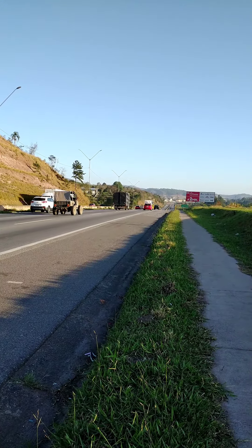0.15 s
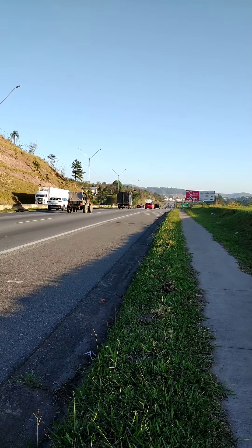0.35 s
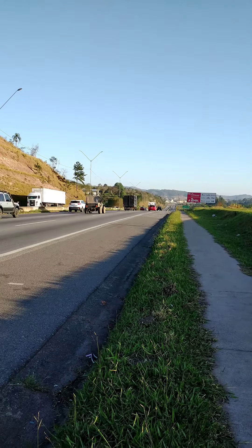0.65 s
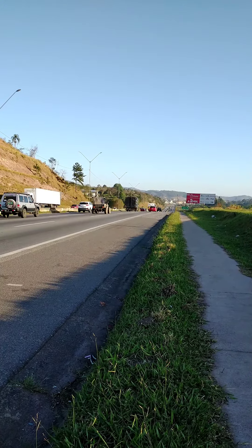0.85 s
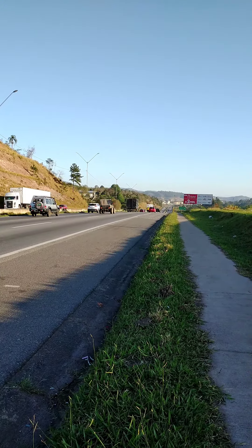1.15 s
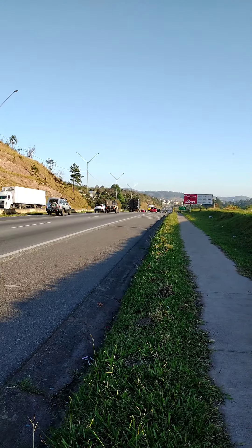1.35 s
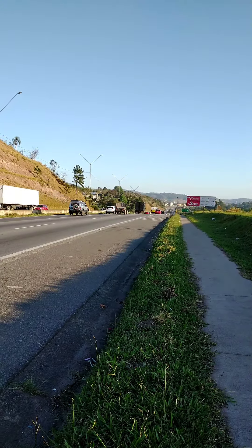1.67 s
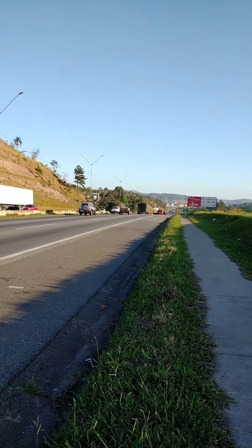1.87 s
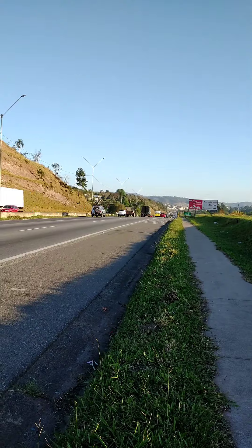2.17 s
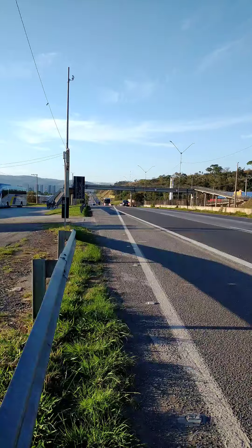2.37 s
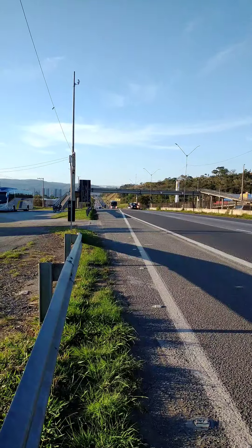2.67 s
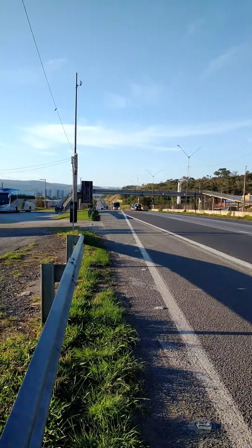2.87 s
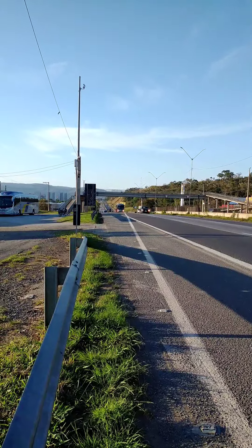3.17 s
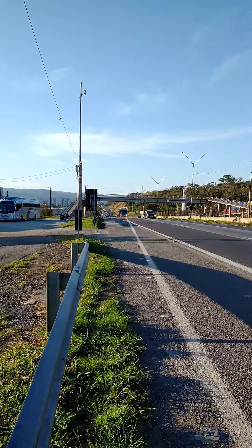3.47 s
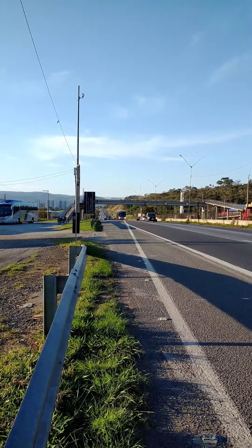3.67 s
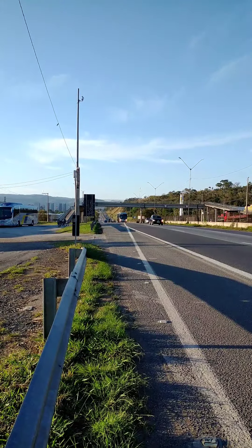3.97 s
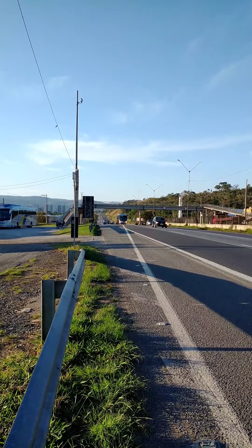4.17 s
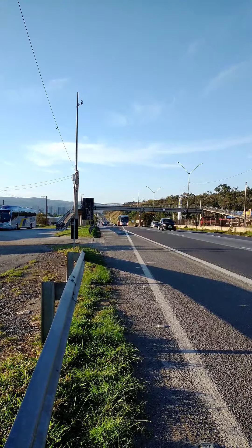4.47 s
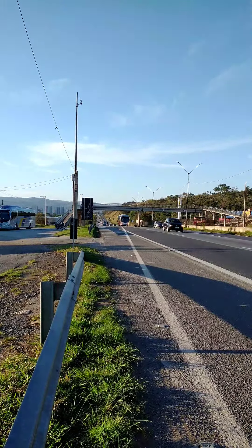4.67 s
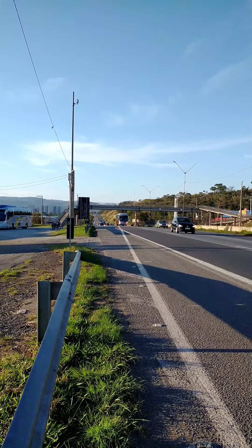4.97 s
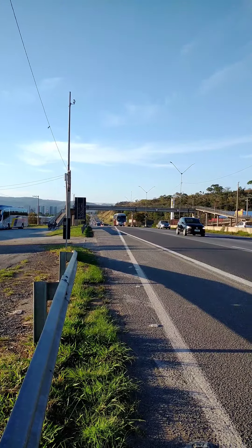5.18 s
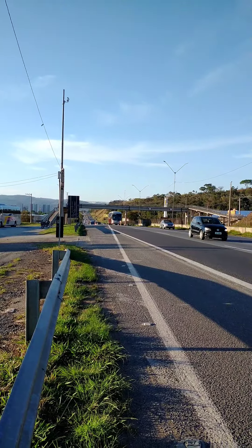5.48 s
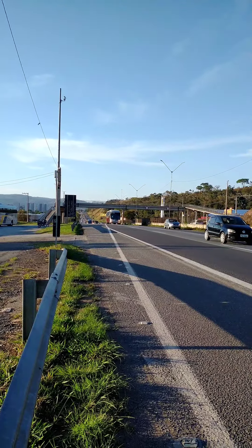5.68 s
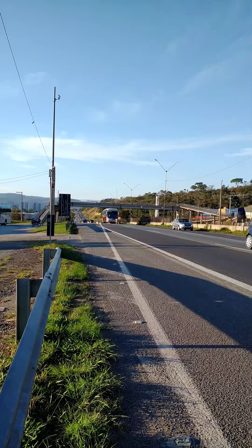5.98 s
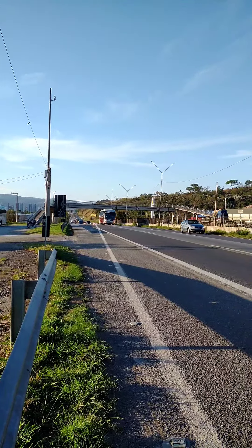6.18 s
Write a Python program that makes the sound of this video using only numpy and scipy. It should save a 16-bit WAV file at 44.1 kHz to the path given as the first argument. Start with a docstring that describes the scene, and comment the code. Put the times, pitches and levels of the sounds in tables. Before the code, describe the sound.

A receding truck engine and far traffic hum along a highway, heard in stereo from a phone at the roadside. After a brief dead silence, a heavy truck rumbles by close, its tyres roaring and singing, with hissing air, a few short squeaks and low wind thumps on the microphone. It moves off, and the tyre noise of oncoming cars swells until the end.

```python
"""Trucks on a highway, heard through a phone's two microphone ports. One drones away uphill at
multiples of its firing rate, amid the tyre roar and engine hum of distant traffic. The sound cuts
out and returns at another spot: a heavy truck passes close with singing tread, hiss, puffs of air,
squeaks and a turbo whistle, and the eddies of its wake buffet the ports. As it leaves, cars come
nearer on roaring tyres, one groove whistling."""
import sys
import numpy as np
from scipy import signal
from scipy.fft import rfft, irfft, next_fast_len
from scipy.io import wavfile
from scipy.ndimage import uniform_filter1d, map_coordinates

SR = 44100
rng = np.random.default_rng(int(sys.argv[2]) if len(sys.argv) > 2 else 0)


def store_wav(level_fs):
    """Save 16-bit WAV to argv[1]."""
    pcm = np.round(np.clip(np.atleast_2d(level_fs), -1, 1) * 32767)
    wavfile.write(sys.argv[1], SR, pcm.T.astype(np.int16))


N = 279153
TIME_S = np.arange(N) / SR
CUT_S, BACK_S = 2.3248, 2.5515  # the silent gap

# Port responses, one per source direction: frequency_hz, coherence, left_lag_rad, left_minus_right_db
FAR_PORTS = [(320, 0.89, 0.24, 4), (490, 1, 0.22, -5.5), (860, 0.91, 0.13, 2), (1600, .87, 0.74, 0),
             (2290, 0.6, 1.86, 4.5), (2850, 0.2, 2.4, -2.5), (3580, 0, 0.74, -2.5), (4300, .6, 0.27, -2.5),
             (6000, .3, 5.5, 7), (12000, .1, 0.83, -5.5)]
TRUCK_PORTS = [(320, 1, 0.05, 1.5), (490, .92, 0.46, 2), (860, 0.96, 0.57, 1.5), (1590, 0.66, 0.79, 1.5),
               (2240, 0.53, 3.1, -2.5), (2900, .4, 1.2, -5), (4300, .57, 0.44, 7), (5800, 0.61, 1.9, -1.5),
               (7000, .36, 1.9, 6), (12270, .25, 2.1, 1.5)]
CAR_PORTS = [(323, 1, -1.4, 2.5), (470, .88, 0.6, -2.5), (840, 1, -0.8, 0.6), (1560, 0.68, 0.3, 2),
             (2190, 0.48, 1.2, 4), (2860, .45, 1.4, -6.5), (3600, .1, 1.4, 0.5), (4200, .5, 0.074, 20),
             (7000, .4, 4, 13.5), (12000, .2, 10.5, 12)]
# Hiss spectrum of both trucks: frequency_hz, relative_db
HISS_SPECTRUM = [(1200, -36), (2500, -2.5), (4300, 0), (5200, -8.5), (8200, -18), (9500, -23),
                 (11500, -19.5), (13500, -28), (15500, -40)]


def amp(db):
    """Amplitude grows tenfold per 20 dB."""
    return 10 ** (np.asarray(db) / 20)


def unit(x):
    """Normalisation to rms 1."""
    return x / np.sqrt(np.mean(x ** 2) + 1e-20)


def along(rows, hz):
    """Interpolation of each column on a logarithmic frequency axis."""
    knots_hz, *columns = np.transpose(rows)
    return np.array([np.interp(np.log(hz + 1), np.log(knots_hz + 1), c) for c in columns])


def curves(rows):
    """Linear interpolation of each column over time."""
    knots_s, *columns = np.transpose(rows)
    return [np.interp(TIME_S, knots_s, c) for c in columns]


def gate(rows, rise_s, fall_s):
    """Trapezoidal envelope: 1 over a table's span, with a fade on either side."""
    start, end = rows[0][0], rows[-1][0]
    return np.interp(TIME_S, [start - rise_s, start, end, end + fall_s], [0, 1, 1, 0])


def glide(rows, hz, hz_per_s):
    """Linear pitch drift from a table's first time."""
    return hz + hz_per_s * (TIME_S - rows[0][0])


def wobble(knots_per_s):
    """Smooth random modulation: a spline through Gaussian values."""
    knots = rng.standard_normal(int(N * knots_per_s / SR) + 4)
    return map_coordinates(knots, [TIME_S * knots_per_s])


def filtered(x, response):
    """Linear filtering: the spectrum times a complex frequency response."""
    size = next_fast_len(N + 8192)
    return irfft(rfft(x, size) * response(np.fft.rfftfreq(size, 1 / SR)), size)[..., :N]


def at_ports(pair, ports):
    """Partial coherence: a shared and an unshared signal mix, then each port has its lag and level."""
    # Long waves reach both ports alike: frequency_hz, coherence, left_lag_rad, left_minus_right_db
    bass_ports = [(130, 1, 0, 0), (240, .992, .06, .7)]
    ports = bass_ports + ports

    def split(hz):
        angle = np.arccos(np.clip(along(ports, hz)[0], 0, 1)) / 2
        return np.array([np.cos(angle), np.sin(angle)])

    def tilt(hz):
        _, lag_rad, pan_db = along(ports, hz)
        left = amp(pan_db / 2) * np.exp(-.5j * lag_rad)
        return np.array([left, 1 / left])

    mid, side = filtered(pair, split)
    return filtered(np.array([mid + side, mid - side]), tilt)


def rush(spectrum, ports, patchy_db):
    """Shaped stereo noise of rms 1, modulated in random patches of time and frequency."""
    cells = signal.stft(rng.standard_normal((2, N)), nperseg=512)[2]
    patches = uniform_filter1d(rng.standard_normal(cells.shape[1:]), size=5, axis=0)
    patches = uniform_filter1d(patches, size=12, axis=1)
    pair = signal.istft(cells * amp(patchy_db * unit(patches)), nperseg=512)[1][:, :N]
    shaped = filtered(pair, lambda hz: amp(along(spectrum, hz)[0]))
    return unit(at_ports(shaped, ports))


def roar(levels, spectrum, ports, rise_s=.04, fall_s=.04):
    """Rolling noise, a little patchy and unsteady as the road surface changes."""
    flutter_db = .35 * wobble(9)
    gain = amp(curves(levels)[0] + flutter_db) * gate(levels, rise_s, fall_s)
    return gain * rush(spectrum, ports, patchy_db=1.2)


def alongside(level_db, arrives_s, leaves_s, halve_before_s, halve_after_s):
    """Spherical spreading: pressure falls as 1 / distance. Gives rows of time_s, level_db."""
    s = np.arange(BACK_S, N / SR, 1 / 20)
    away = np.maximum(arrives_s - s, 0) / halve_before_s + np.maximum(s - leaves_s, 0) / halve_after_s
    return np.transpose([s, level_db - 20 * np.log10(1 + away)])


def tone(hz, rms_db, waver_rad):
    """A sine whose spectral line is broadened by random phase modulation."""
    phase = 2 * np.pi * (np.cumsum(hz) / SR + rng.random()) + waver_rad * wobble(14)
    return np.sqrt(2) * amp(rms_db) * np.sin(phase)


def hum(levels, start_hz, hz_per_s, waver_rad):
    """A gliding tone whose amplitude modulation scales with its phase wander."""
    level_db = curves(levels)[0] + 4 * waver_rad * wobble(30)
    return gate(levels, .039, .2) * tone(glide(levels, start_hz, hz_per_s), level_db, waver_rad)


def engine(levels, firing_hz, orders, rough_rad, dip_db=0):
    """Periodic firing gives two clean harmonics; uneven cylinders add weaker, fluttering orders."""
    first_db, second_db = curves(levels)
    first_db = first_db - dip_db
    slow_db = uniform_filter1d(first_db, size=SR // 3)
    weak = sum(tone(k * firing_hz, slow_db + db + 4 * wobble(11), rough_rad * k) for k, db in orders)
    clean = tone(firing_hz, first_db, .08) + tone(2 * firing_hz, second_db, .14)
    return gate(levels, .054, .12) * (clean + weak)


def uphill_engine():
    """Engine orders of a receding truck: the first fades with distance while the second swells."""
    levels = [(0, -28.5, -31), (.3, -32, -21), (.63, -39, -30), (.97, -37.5, -25.5), (1.32, -38.5, -30),
              (1.58, -38, -34), (1.95, -39, -30.5), (2.32, -39, -35)]  # harmonics: time_s, firing_order_db, second_order_db
    orders = [(1.5, -6.5), (2.5, -12.5), (3, -7), (3.5, -10), (4, -10.5)]  # weak orders: firing_multiple, over_firing_order_db
    return engine(levels, glide(levels, hz=77, hz_per_s=.8), orders, rough_rad=.31)


def uphill_tyres():
    """High-frequency rolling noise fades as the first truck recedes."""
    levels = [(0, -57), (.2, -59.5), (.5, -63.5), (.9, -70)]  # tyre hiss: time_s, level_db
    return roar(levels, HISS_SPECTRUM, FAR_PORTS, fall_s=.4)


def distant_traffic():
    """Rolling noise of many far tyres adds incoherently to a dull roar."""
    levels = [(0, -26.5), (.25, -28.5), (.6, -30.5), (1.1, -31.5), (1.7, -32), (2.32, -33)]  # distant tyres: time_s, level_db
    spectrum = [(20, -53), (45, -20), (95, -10), (135, -9.5), (270, -5.5), (440, -16), (760, -4.5),
                (1150, -13), (1500, -12.5), (2300, -20), (3200, -41), (4100, -41.5), (5500, -53),
                (15500, -72.5)]  # their roar: frequency_hz, relative_db
    return roar(levels, spectrum, FAR_PORTS)


def other_engines():
    """Periodic firing of other engines, each heard as one drifting partial."""
    pitches = [(107.5, 1.3, .3), (230.5, -1.2, .45), (202, -.5, .9), (120, -1.8, .39), (58, -.8, .3)]  # hums: start_hz, glide_hz_per_s, waver_rad
    envelopes = [
        [(0, -31), (.3, -35), (.7, -45), (1.1, -36), (1.7, -50), (2.32, -43)],
        [(2.58, -34.5), (2.9, -31.5), (3.5, -44)],
        [(3.2, -41), (3.6, -30), (4.1, -35), (4.6, -35.5), (4.75, -39)],
        [(2.9, -37), (3.5, -30), (4.1, -44), (4.35, -31), (4.7, -39), (5.3, -42), (5.9, -38), (6.2, -33),
         (6.33, -33)],
        [(2.58, -37), (3.5, -47), (5.2, -47), (6.33, -54)],
    ]  # one table per hum: time_s, level_db
    return sum(hum(levels, *pitch) for levels, pitch in zip(envelopes, pitches))


def passing_roar():
    """Broadband tyre and exhaust noise of the close truck follows the inverse-distance law."""
    spectrum = [(20, -57), (50, -19.5), (75, -3.5), (140, -2.4), (270, -4.5), (420, -8), (650, -6.9),
                (1100, -10.5), (1800, -18), (2600, -25.5), (4300, -40), (5500, -44), (8000, -52),
                (15500, -75)]  # tyres and exhaust: frequency_hz, relative_db
    levels = alongside(-22.9, arrives_s=2.9, leaves_s=4.3, halve_before_s=1.0, halve_after_s=.31)
    return roar(levels, spectrum, TRUCK_PORTS, rise_s=.064)


def passing_hiss():
    """Air and grit off the close truck radiate high-frequency noise."""
    levels = [(2.55, -46), (2.85, -44), (3, -47), (3.1, -42), (3.3, -45.5), (3.37, -54), (4.3, -62),
              (4.7, -69), (5.2, -73)]  # air and grit: time_s, level_db
    return roar(levels, HISS_SPECTRUM, TRUCK_PORTS, rise_s=.11, fall_s=.32)


def passing_engine():
    """Engine orders follow the load: the close truck pulls hard, lifts off, blips once and leaves."""
    levels = [(2.58, -22, -36), (2.75, -19.5, -28), (3.2, -21, -32.5), (3.58, -21.5, -38), (3.7, -46, -42),
              (3.79, -39, -38), (3.845, -22, -40), (3.92, -37, -37), (4.2, -30, -33), (4.36, -30, -39),
              (4.44, -42, -42)]  # harmonics: time_s, firing_order_db, second_order_db
    orders = [(1.5, -19.5), (3, -19), (3.5, -15.5)]  # weak orders: firing_multiple, over_firing_order_db
    dips = [(2.815, 8), (2.99, 12), (3.1, 8), (3.235, 11), (3.38, 16), (3.47, 6)]  # brief dips of the drone: centre_s, depth_db
    half_width_s = .036
    dip_db = sum(db * np.exp(-((TIME_S - s) / half_width_s) ** 2) for s, db in dips)
    return engine(levels, glide(levels, hz=90, hz_per_s=-1.7), orders, rough_rad=.35, dip_db=dip_db)


def tyre_tread():
    """Periodic impacts of tread blocks make a tone; it sags, and steps down as the last axles pass."""
    levels = [(2.6, -36.5), (2.95, -31), (3.1, -37), (3.35, -33), (3.5, -38), (3.8, -32), (3.95, -23),
              (4.05, -37), (4.7, -45)]  # tread tone: time_s, level_db
    step_hz, step_at_s, step_width_s = 16, 4.1, .06
    drop_hz = step_hz / (1 + np.exp((step_at_s - TIME_S) / step_width_s))
    return hum(levels, start_hz=519 - drop_hz, hz_per_s=-12, waver_rad=.87)


def wake():
    """Turbulent pressure: eddies of the truck's wake and a faint breeze thump each port independently."""
    spectrum = [(15, -60), (25, -14.5), (73, -4), (119, -1), (320, -16.5), (350, -15.5), (460, -47.5),
                (770, -120)]  # buffeting: frequency_hz, relative_db
    full_db, from_s, to_s, breeze_db = -30.5, 3.1, 4.05, -57
    rise_db_per_s, fall_db_per_s = 90, 32
    noise = filtered(rng.standard_normal((2, N)), lambda hz: amp(along(spectrum, hz)[0]))
    eddies = amp(4.5 * np.array([wobble(22), wobble(22)]))
    wake_db = full_db - rise_db_per_s * np.maximum(from_s - TIME_S, 0)
    wake_db -= fall_db_per_s * np.maximum(TIME_S - to_s, 0)
    return (amp(wake_db) + amp(breeze_db) * (TIME_S > BACK_S)) * unit(eddies * noise)


def air_puffs():
    """Jet noise: compressed air escapes in short, bright swells."""
    puffs = [(2.875, -51.5, 0.11), (3.16, -68.5, .14), (3.31, -61.5, 0.034), (3.65, -65.5, .04),
             (5.18, -72, 0.032), (5.52, -74, .05), (5.98, -71, .05), (6.1, -70, 0.055), (6.23, -65.5, .07)]  # air releases: centre_s, peak_db, length_s
    spectrum = [(2500, -28), (5000, -0.5), (8000, -1), (12000, -4), (15500, -9.5)]  # escaping air: frequency_hz, relative_db
    swell = sum(amp(db) * np.exp(-np.abs((TIME_S - s) / (length / 2)) ** 3) for s, db, length in puffs)
    return swell * rush(spectrum, TRUCK_PORTS, patchy_db=-4.0)


def turbo_whistle():
    """A high tone sinks as the truck leaves; fast phase modulation makes it breathy."""
    course = [(2.95, 11800, -78), (3.1, 11500, -72), (3.65, 10500, -78), (4.2, 9900, -81), (4.9, 9600, -84)]  # turbo tone: time_s, pitch_hz, level_db
    hz, db = curves(course)
    phase = 2 * np.pi * np.cumsum(hz) / SR + 1.9 * np.array([wobble(700), wobble(700)])
    return gate(course, .05, .2) * np.sqrt(2) * amp(db + 4 * wobble(14)) * np.sin(phase)


def squeaks():
    """Gaussian tone bursts from the truck, roughened by phase modulation."""
    pips = [(2.978, -38, 4800, 0.0096), (3.652, -45, 4850, 0.017), (4.227, -42, 4260, .008),
            (4.248, -43, 4190, 0.0091)]  # squeaks: centre_s, peak_db, pitch_hz, length_s
    sound = np.zeros(N)
    for centre_s, peak_db, hz, length_s in pips:
        envelope = amp(peak_db) * np.exp(-((TIME_S - centre_s) / (length_s / 2)) ** 2)
        sound += envelope * np.sin(2 * np.pi * hz * TIME_S + 1.2 * wobble(540))
    return sound


def approaching_cars():
    """Rolling noise of a stream of cars grows by the inverse-distance law."""
    spectrum = [(20, -59), (50, -8.5), (90, 1.5), (200, 0), (430, -9), (750, -6.5), (1100, -9), (1350, -9),
                (1750, -6), (2250, -16), (3100, -33.5), (4100, -46), (5500, -46), (15500, -67.5)]  # car tyres: frequency_hz, relative_db
    levels = alongside(-32, arrives_s=5.2, leaves_s=6.4, halve_before_s=.9, halve_after_s=.9)
    return roar(levels, spectrum, CAR_PORTS)


def tyre_groove():
    """Air resonance in a tyre groove whistles as a narrow band of noise."""
    levels = [(5.05, -53), (5.3, -47.5), (5.6, -44)]  # groove whistle: time_s, level_db
    spectrum = [(1900, -40), (2120, -9), (2200, 7), (2280, -7), (2550, -40), (4000, -90)]  # its resonance: frequency_hz, relative_db
    return roar(levels, spectrum, CAR_PORTS, rise_s=.055, fall_s=.05)


def nearest_car():
    """Rolling noise, strongest near 1 kHz, swells as the nearest car closes in."""
    levels = [(5.45, -38), (5.7, -35.5), (5.95, -32.5), (6.1, -31), (6.33, -28)]  # its tyres: time_s, level_db
    spectrum = [(60, -30), (300, -10.5), (450, -22), (700, -6), (1080, -0.5), (1380, -11.5), (1730, -6),
                (2100, -13), (3000, -28.5), (6000, -48), (15500, -64.5)]  # their roar: frequency_hz, relative_db
    return roar(levels, spectrum, CAR_PORTS, rise_s=.18)


def scene():
    """Superposition at two ports: low tones arrive nearly alike, noise differs more in the treble."""
    tonal = uphill_engine() + passing_engine() + other_engines() + tyre_tread() + squeaks()
    tones = at_ports(np.array([tonal, np.zeros(N)]), TRUCK_PORTS)
    road = distant_traffic() + uphill_tyres() + passing_roar()
    cars = approaching_cars() + nearest_car() + tyre_groove()
    air = passing_hiss() + air_puffs() + turbo_whistle() + wake()
    return tones + road + cars + air


def record(dry):
    """Cavity resonance colours the sound; it stops dead, fades back in and is band-limited."""
    resonances = [(4090, 380, 1), (6260, 630, 2.5), (8200, 740, 3), (9800, 500, 2.5), (11150, 720, 0.5)]  # port cavities: centre_hz, half_width_hz, gain_db
    fade_in = [(0, -24), (.009, -13), (.012, -5), (.035, -3.5), (.055, 1.5)]  # return of the sound: after_gap_s, gain_db
    top_hz = 15750

    def cavities(hz):
        return amp(sum(db * np.exp(-((hz - centre) / width) ** 2) for centre, width, db in resonances))

    returning = amp(np.interp(TIME_S - BACK_S, *np.transpose(fade_in))) * (TIME_S > BACK_S)
    interrupted = filtered(dry, cavities) * np.where(TIME_S < CUT_S, 1, returning)
    return filtered(interrupted, lambda hz: hz < top_hz)


dry = scene()
out = record(dry)
store_wav(out)
```